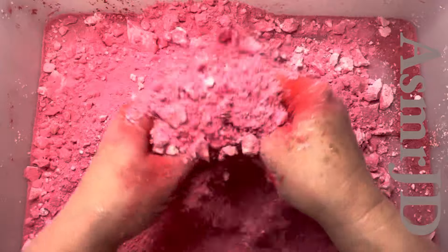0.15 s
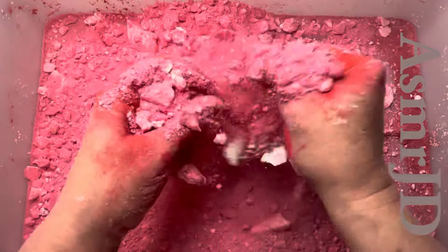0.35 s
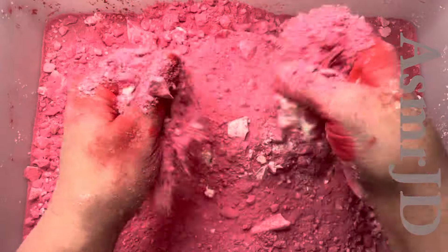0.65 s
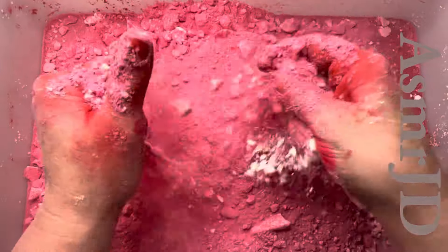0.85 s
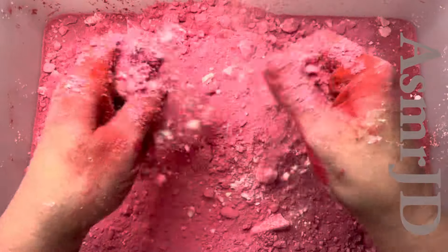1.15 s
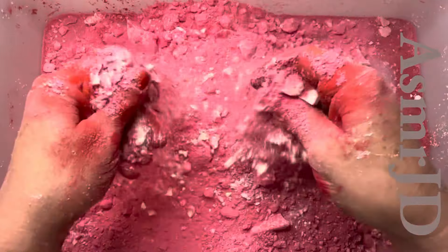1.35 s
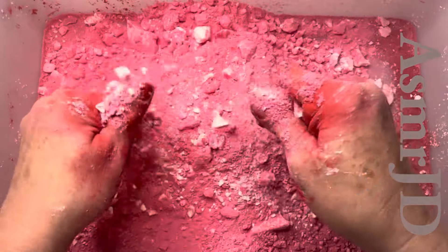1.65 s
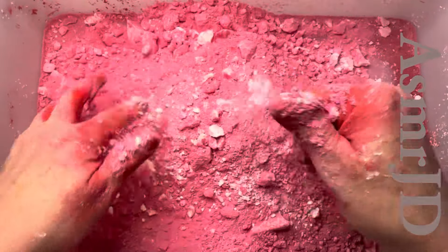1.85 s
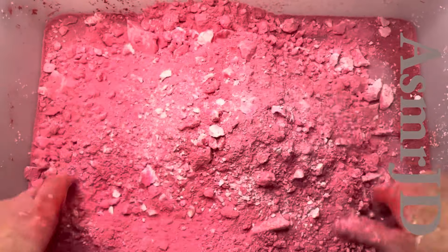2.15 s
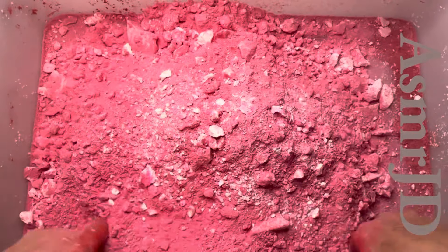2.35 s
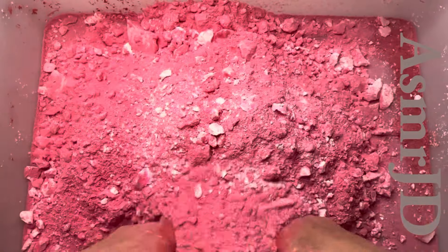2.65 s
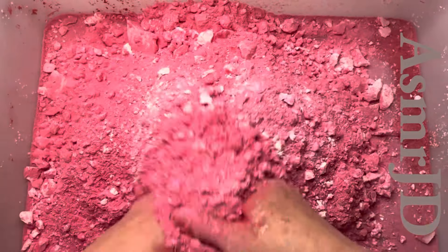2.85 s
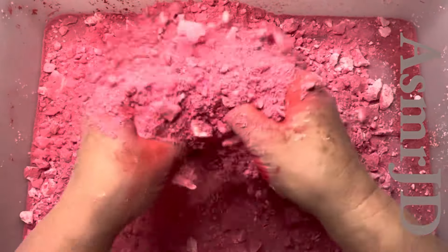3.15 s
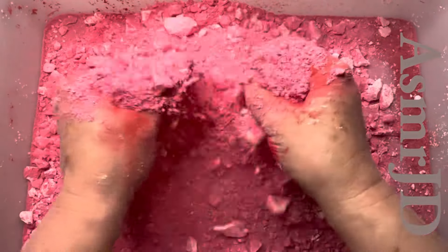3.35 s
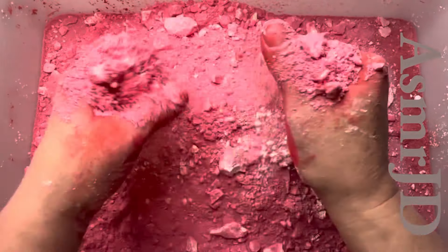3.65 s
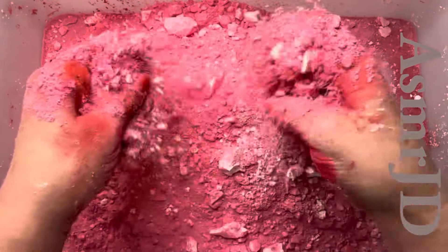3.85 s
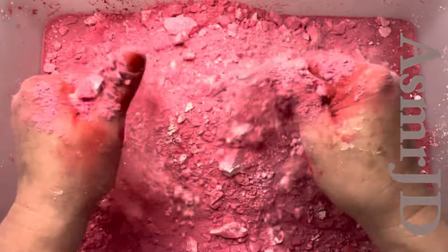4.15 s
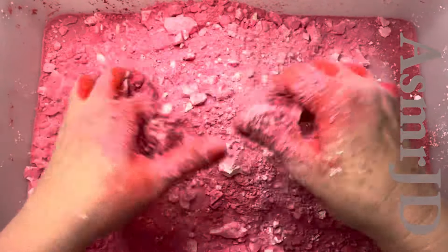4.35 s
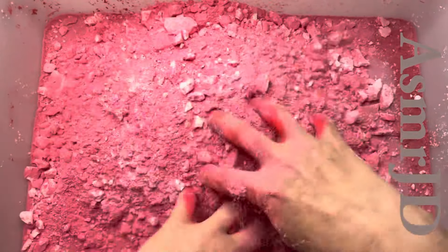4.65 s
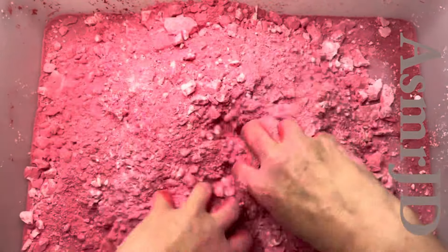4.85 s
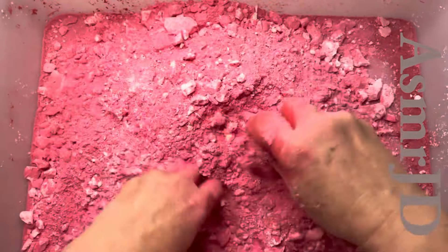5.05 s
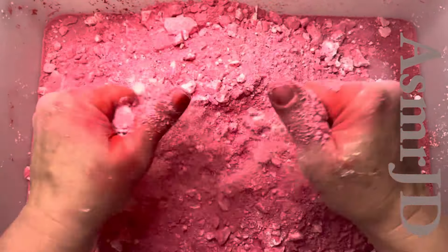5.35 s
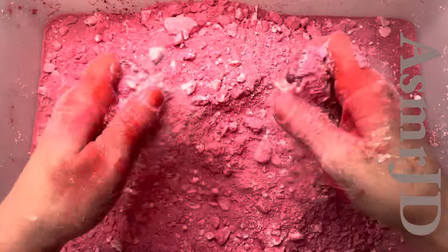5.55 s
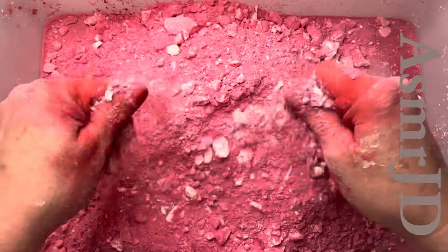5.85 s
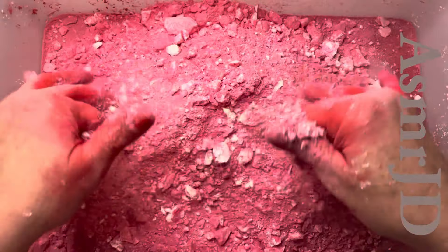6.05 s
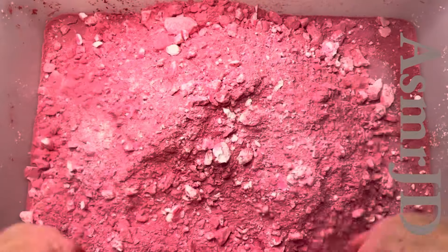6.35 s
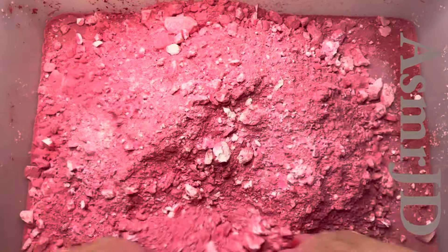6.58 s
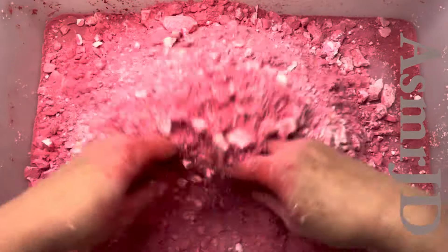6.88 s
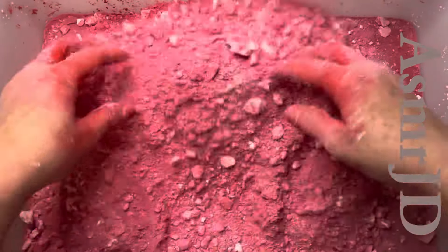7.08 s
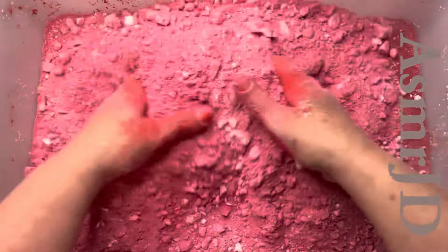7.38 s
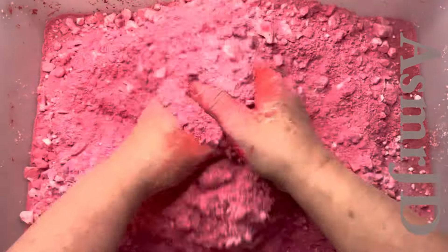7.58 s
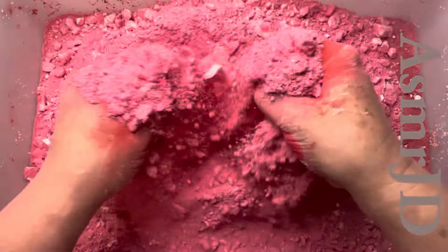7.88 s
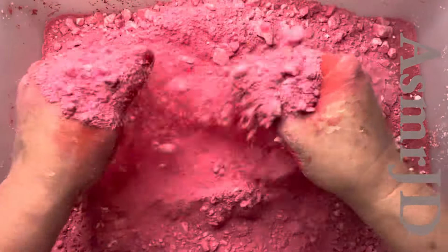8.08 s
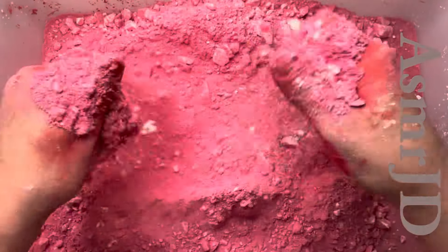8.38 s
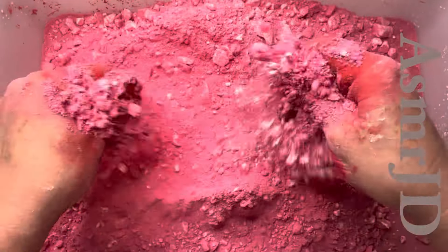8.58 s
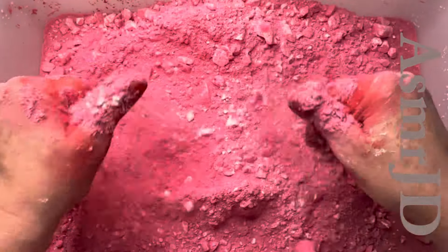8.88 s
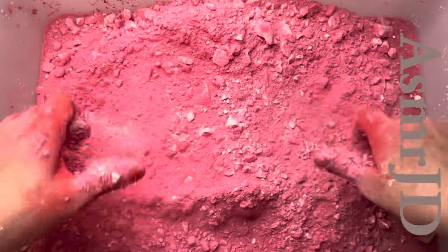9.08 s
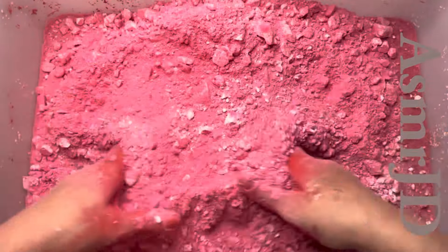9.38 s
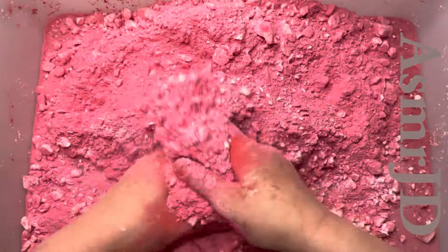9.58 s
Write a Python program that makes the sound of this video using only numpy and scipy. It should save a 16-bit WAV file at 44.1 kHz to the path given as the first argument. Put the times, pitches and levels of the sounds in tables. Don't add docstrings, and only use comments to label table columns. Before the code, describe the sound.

Close stereo microphones catch two hands working dry chalk in a plastic bin in a small, dry space. Scoops rustle dully, fists crunch lumps with sharp crackles, and crumbs patter as powder hisses down. The work eases briefly between handfuls, then grows denser after six seconds with two thumps. A hard knuckle knock booms on the bin floor near nine seconds. A low steady hum runs beneath throughout.

```python
import sys
import numpy as np
from scipy import signal
from scipy.fft import rfft, irfft, next_fast_len
from scipy.io import wavfile
from scipy.ndimage import uniform_filter1d, map_coordinates

SR = 44100
rng = np.random.default_rng(int(sys.argv[2]) if len(sys.argv) > 2 else 0)


def undo_db(level):
    steps = np.asarray(level, float) / 20
    return 10 ** steps


def store_wav(level_fs):
    pcm = np.round(np.clip(np.atleast_2d(level_fs), -1, 1) * 32767)
    wavfile.write(sys.argv[1], SR, pcm.T.astype(np.int16))


N = 428652

# peak time in seconds, level in dB, swell and fade in seconds per 10 dB.
SCOOPS = [(0.02, -44.5, 6, 0.2), (0.908, -48.5, 0.7, 0.07), (1.559, -50.5, 0.2, 0.2),
          (1.925, -52.2, -0.2, 0), (2.146, -52.5, 0.45, 4.5), (2.451, -44, -0.04, 0.4),
          (2.768, -36.5, 0.26, 0.13), (2.994, -39, 0.09, 0.079), (3.753, -55.5, -0.6, 0.2),
          (4.785, -41.5, 0.2, 0.4), (5.059, -46.5, 0.14, 0.08), (5.34, -51, -0.5, -0.3),
          (6.647, -36, 0.09, 0.18), (6.857, -41, 0.16, 0.13), (7.08, -33, -0.05, 0.28),
          (7.292, -38.5, 0.08, 0.218), (7.583, -40, 0.24, 0.17), (9.209, -28, 0.03, 0.055),
          (9.326, -36, 0.12, 0.07), (9.714, -38.5, 0.41, -4.5)]


def unit(x):
    return x / np.sqrt(np.mean(x ** 2) + 1e-20)


def along(points, hz):
    f, v = np.transpose(points)
    return np.interp(np.log(hz + 1), np.log(f + 1), v)


def wobble(rate):
    knots = rng.standard_normal(int(N * rate / SR) + 4)
    return map_coordinates(knots, [np.arange(N) * rate / SR])


def filtered(x, response):
    m = next_fast_len(N + SR // 2)
    return irfft(rfft(x, m) * response(np.fft.rfftfreq(m, 1 / SR)), m)[..., :N]


def coloured(x, spectrum):
    below = [(1, -120), (spectrum[0][0] / 2, -90)]
    above = [(spectrum[-1][0] * 2, -90)]
    return unit(filtered(x, lambda hz: undo_db(along(below + spectrum + above, hz))))


def machine():
    # frequency in Hz, level in dB rms.
    hum_lines = [(102, -51.5), (214, -71), (227, -62.5)]
    # frequency in Hz, room air in dB per Hz.
    air_spectrum = [(28, -11), (37, 16), (70, 2), (250, -11.5), (800, -57), (10000, -41), (16000, -22)]
    hum_hz, hum_db = 54.3, -33

    def drifting_tone(hz):
        return np.sin(2 * np.pi * np.cumsum(hz + 0.882 * wobble(9)) / SR)

    hum = undo_db(hum_db + 0.8 * wobble(4) + 0.9 * wobble(14)) * drifting_tone(hum_hz)
    lines = sum(undo_db(db + 2.8 * wobble(6)) * drifting_tone(hz) for hz, db in hum_lines)
    air = undo_db(-51.0) * coloured(rng.standard_normal((2, N)), air_spectrum)
    return np.sqrt(2) * (hum + lines) * [[1], [0]] + air


def walls(x):
    # frequency in Hz, decay by 60 dB in seconds.
    bin_decay = [(200, 0.069), (10000, 0.046)]
    hz, t, z = signal.stft(rng.standard_normal((2, SR // 6)), SR, nperseg=128)
    decay = undo_db(-60 * t / along(bin_decay, hz)[:, None])
    tail = signal.istft(z * decay, SR, nperseg=128)[1]
    return signal.fftconvolve(x, tail / np.linalg.norm(tail[0]), axes=1)[:, :N]


def curves(rows):
    quickest_s = 0.015
    s, db, swell, fade = np.transpose(rows)[..., None]
    t = np.arange(0, N, 32) / SR
    rising = (s - t) / np.maximum(swell, quickest_s)
    falling = (t - s) / np.maximum(fade, quickest_s)
    power = undo_db(db - 10 * np.where(t < s, rising, falling)) ** 2
    return np.interp(np.arange(N) / SR, t, np.sum(power, axis=0))


def bin_floor():
    # start in seconds, peak in dB, pitch in Hz, decay by 60 dB in seconds.
    blows = [
        (4.798, -35, 98, 0.37),
        (6.405, -18.5, 115, 0.2),
        (6.545, -21.5, 117, 0.12),
        (7.241, -24, 94.4, 0.22),
        (9.2013, -10, 232, 0.028),
        (9.202, -17, 400, 0.032),
        (9.204, -6, 123.5, 0.17),
    ]
    # frequency in Hz, drumming in dB per Hz.
    panel_spectrum = [(50, -30), (75, -2.5), (120, 0.5), (160, -13), (250, -59)]
    rest_db, load_db = -51, -6.5
    out, t = np.zeros(N + SR), np.arange(SR // 2) / SR
    for s, db, hz, t60 in blows:
        onset = (1 - np.exp(-t * hz / 0.63)) ** 2
        boom = undo_db(-60 * t / t60) * onset * np.sin(2 * np.pi * hz * t)
        overtone = undo_db(-8.0 - 60 * t / (0.18 * t60)) * np.sin(2 * np.pi * 2.06 * hz * t)
        table = undo_db(-9.5 - 60 * t / t60) * (1 - np.exp(-t / 0.016)) * np.sin(2 * np.pi * 66 * t)
        out[round(s * SR):][:len(t)] += undo_db(db + 2.5) * (boom + overtone + table)
    load = np.sqrt(undo_db(2 * rest_db) + undo_db(2 * load_db) * curves(SCOOPS))
    drum = load * undo_db(-3 + 2.8 * wobble(12)) * coloured(rng.standard_normal((2, N)), panel_spectrum)
    return drum + out[:N] * [[1], [0]]


def squeaks():
    # start in seconds, length in seconds, pitch in Hz, level in dB.
    slips = [
        (4.752, 0.038, 3725, -46),
        (6.369, 0.0079, 6300, -41),
        (.294, .01, 6400, -40),
        (7.154, 0.0063, 1850, -34),
        (7.162, .008, 1880, -37),
        (7.8, .007, 2300, -37),
    ]
    t = np.arange(N) / SR
    out = np.zeros(N)
    for s, length, hz, db in slips:
        swell = np.sqrt(np.sin(np.pi * np.clip((t - s) / length, 0, 1)).clip(0))
        out += undo_db(db + 2.4 * wobble(160)) * swell * np.sin(2 * np.pi * hz * t)
    return out


def cracks():
    # start in seconds, peak in dB, pitch in Hz.
    clean_snaps = [(.0346, -28.5, 1690), (0.265, -33, 1900), (0.3299, -26, 1080), (0.5404, -35, 2000),
                   (.706, -19.5, 3250), (.8462, -37, 1850), (1.2136, -27, 1490), (2.024, -38.5, 1660),
                   (3.0458, -21.5, 2600), (3.0573, -23, 1010), (3.3195, -27, 2940), (4.082, -20, 1870),
                   (4.0977, -30, 3100), (4.126, -29, 1350), (5.198, -22, 3060), (5.2557, -28, 3100),
                   (5.289, -36.5, 2810), (5.356, -40, 2300), (1.074, -43, 3500), (5.453, -30.5, 2340),
                   (6.0082, -39, 2870), (1.0252, -36, 2360), (6.3053, -15, 1850), (6.4037, -16, 1200),
                   (7.537, -24.5, 1290), (7.623, -20.5, 3600), (7.5274, -34, 2600), (8.1174, -31, 2040),
                   (8.3313, -30, 2800), (8.3432, -31, 1940), (8.456, -29.5, 3140), (9.4063, -34.5, 990),
                   (3.077, -33, 2400), (3.464, -34, 3100), (5.0787, -38, 2000), (6.099, -44, 3000),
                   (6.5103, -27.5, 2610), (7.037, -38.5, 2800), (7.598, -32, 2510), (8.2616, -42, 1500),
                   (8.56, -36, 2100)]
    flake_spits = [(.123, -31, 6740), (.291, -23.5, 2820), (.73, -29, 5400), (.977, -34, 3960),
                   (1.095, -36, 3320), (1.5278, -29.5, 6090), (1.793, -40, 2240), (1.841, -32, 5730),
                   (3.1727, -30, 2710), (3.4, -36, 2900), (3.4867, -26.5, 970), (3.8507, -33, 1860),
                   (4.1419, -29.5, 2520), (4.932, -26.5, 1020), (5.0959, -16.5, 4020), (5.099, -16.5, 3300),
                   (5.133, -19, 5800), (5.153, -24, 5560), (5.1617, -25, 2930), (5.1855, -20, 5770),
                   (5.235, -19.5, 3720), (5.6312, -32, 2090), (5.816, -29.5, 4020), (7.6123, -22, 3260),
                   (8.136, -24.5, 1870), (8.284, -20, 3160), (8.306, -31.5, 1720), (8.6948, -26.5, 2900),
                   (8.8288, -29.5, 3200), (9.0303, -37, 6200)]
    deep_knocks = [(0.135, -27.5, 1130), (0.1927, -32.5, 830), (1.1718, -20.5, 1700), (1.4645, -30, 1860),
                   (3.111, -25, 1570), (3.1805, -19.5, 860), (3.188, -21, 1110), (3.2856, -27.5, 1810),
                   (3.3248, -26.5, 860), (3.824, -36.5, 1770), (6.124, -22, 890), (7.0612, -22, 870),
                   (7.0697, -22, 1660), (7.0809, -22.5, 1740), (7.2722, -28, 965), (7.736, -14.5, 1520),
                   (7.8123, -27.5, 1220), (7.8629, -16.5, 1900), (7.8764, -45, 1680), (8.0412, -19.5, 5900),
                   (8.052, -24.5, 1320), (8.1037, -26.5, 1510), (8.139, -25.5, 820), (8.9887, -33, 1400),
                   (9.2017, -26, 1000)]
    big_shatters = [(.2978, -25, 6460), (0.6697, -31.5, 3400), (1.311, -25.5, 3070), (1.37, -28, 3770),
                    (1.983, -36, 1330), (3.178, -16.5, 2620), (3.373, -17, 3030), (3.5633, -26.5, 2540),
                    (4.4084, -36.5, 1240), (4.6678, -41, 1370), (5.6955, -30.5, 2410), (6.1657, -39, 6000),
                    (6.1766, -33.5, 1720), (6.3096, -21.5, 1020), (6.3164, -24, 6450), (7.6933, -30.5, 890),
                    (7.979, -23, 5500), (9.132, -35, 8050), (9.196, -15, 1620)]
    crumb_ticks = [(0.2219, -40, 2120), (0.3536, -31, 2020), (0.389, -32, 2430), (0.4284, -37, 2150),
                   (0.4633, -36.5, 6090), (0.6, -36, 1320), (0.632, -35, 1390), (0.754, -36, 2970),
                   (0.7961, -39, 2790), (0.8854, -31.5, 2370), (0.8976, -34, 1390), (1.244, -37, 1360),
                   (1.3844, -35, 1430), (1.441, -43, 2060), (1.6736, -33, 7000), (1.8647, -39, 1520),
                   (2.9421, -29.5, 1910), (3.0942, -28, 2860), (3.1508, -38, 2730), (3.2605, -30, 1510),
                   (3.4104, -33, 1430), (3.8751, -48, 1410), (4.0547, -38, 1870), (4.1847, -39, 3030),
                   (4.8994, -39, 1300), (5.032, -35, 1490), (6.5473, -28, 1440), (6.9733, -38, 1310),
                   (7.124, -38, 1750), (7.2285, -37, 1700), (7.2944, -42, 1670), (7.3163, -38, 1450),
                   (7.496, -45, 1330), (7.9119, -26.5, 2110), (8.184, -40, 1510), (8.4067, -37.5, 1940),
                   (8.4243, -36, 1600), (8.5321, -30, 1320), (8.5994, -37, 1310), (8.6606, -30, 2720),
                   (8.76, -31, 5840), (8.8154, -32, 1940), (8.8444, -38, 2530), (8.9615, -39, 1340)]
    soft_clods = [(0.057, -35, 1360), (0.299, -25, 840), (0.334, -25, 848), (0.358, -32, 689),
                  (0.818, -35, 947), (1.556, -43, 624), (2.097, -36, 624), (2.275, -27.5, 837),
                  (2.42, -35, 646), (2.502, -29, 641), (2.634, -32, 694), (2.797, -29, 600),
                  (2.95, -28, 853), (4.864, -32.5, 816), (5.662, -38, 861), (6.093, -41, 729),
                  (6.66, -21, 600), (6.749, -29.5, 600), (6.873, -35, 950), (7.094, -21.5, 716),
                  (7.25, -25, 673), (7.314, -41, 902), (7.554, -27, 705), (7.648, -27, 719),
                  (7.924, -33, 622), (8.196, -42, 937), (8.643, -45, 614), (9.115, -40.5, 678),
                  (9.167, -37, 689), (9.518, -50, 738), (9.622, -31, 606), (9.661, -45, 711),
                  (9.697, -40, 627)]
    # dull part in dB, bright part in dB.
    balances = [
        (-19, -29),
        (-33, -5),
        (-1.5, -16),
        (-6.5, -2),
        (-19, -9),
        (-2.5, -19),
    ]
    knock_lags = 0.54
    kinds = [clean_snaps, flake_spits, deep_knocks, big_shatters, crumb_ticks, soft_clods]
    breaks = sorted(tuple(row) + tuple(balance) for rows, balance in zip(kinds, balances) for row in rows)
    out, t = np.zeros((2, N + SR)), np.arange(SR // 60) / SR
    chance = rng.standard_normal((len(breaks), 6, len(t)))
    bright = signal.butter(1, [4200, 9500], "bandpass", fs=SR)

    def falling_tone(hz, end, fall_s):
        cycles = end * t + (1.3 - end) * fall_s * (1 - np.exp(-t / fall_s))
        return np.sin(2 * np.pi * hz * cycles)

    for (s, db, hz, dull_db, bright_db), z in zip(breaks, chance):
        snap = undo_db(-60 * t * np.sqrt(hz / 2000) / 0.0027) * falling_tone(hz, end=0.37, fall_s=0.00098)
        snap += undo_db(-17.5 - 60 * t * hz / 14) * np.sin(2 * np.pi * hz * t)
        spit = undo_db(bright_db - 1.3 - 60 * t / 0.0056) * signal.lfilter(*bright, np.sign(z[:2]))
        band = signal.butter(1, np.clip([0.5 * hz, 0.79 * hz], 50, SR / 2.2), "bandpass", fs=SR)
        rubble = undo_db(-3.5 - 60 * t / 0.011) * signal.lfilter(*band, z[4:])
        knock = undo_db(dull_db + 4.0 - knock_lags * (db + 26.0) - 60 * t / 0.012)
        knock *= 1 - np.exp(-t / 0.0014)
        knock *= falling_tone(620 * undo_db(2.27 * z[3, 0]), end=0.77, fall_s=0.0029)
        place = [[1], [np.tanh(z[2, 0])]]
        out[:, round(s * SR):][:, :len(t)] += undo_db(db + 4.5) * (spit + rubble + (snap + knock) * place)
    return out[:, :N]


def hush():
    # start in seconds, end in seconds, depth in dB.
    rests = [
        (1.07, 1.155, 4),
        (1.877, 1.994, 6.5),
        (2.202, 2.258, 3),
        (4.505, 4.623, 6.5),
        (6.236, 6.293, 15),
        (9.065, 9.112, 17),
    ]
    stop_s, start_s = 0.084, 0.016
    t = np.arange(N) / SR
    lost = np.zeros(N)
    for a, b, db in rests:
        lost += db * np.clip(np.minimum((t - a) / stop_s + 0.5, (b - t) / start_s + 0.5), 0, 1)
    return lost


def work():
    # time in seconds, level in dB, weight of the handful in dB, fade in seconds per 10 dB.
    fists = [(0.308, -42, 1.5, 0.02), (0.572, -55, -16, 0.97), (0.714, -48, -4.5, 0.21),
             (1.192, -48.5, -9, 0.03), (1.366, -46.5, -2, -0.07), (1.873, -57, -11, -0.04),
             (2.109, -47.5, 0, 0), (2.298, -52.5, 1.5, 0.56), (3.022, -41, -14.5, 0.36),
             (3.19, -49, 12, -0.01), (3.282, -43.5, 7.5, 0.06), (3.467, -57.5, 3.5, 0.86),
             (3.839, -50.5, 2.5, 0.1), (4.104, -51.5, 7.5, 0.06), (4.412, -50, 3.5, -0.5),
             (4.685, -44, 5, -0.07), (4.902, -45.5, -12.9, 0.12), (5.133, -46.5, -15, -0.15),
             (5.475, -59, -10, 0.04), (5.684, -54, 7.5, 0.241), (6.137, -51.5, 3.5, 0.4),
             (6.325, -38.5, 3, 0), (6.419, -46.5, 6.5, 0.36), (7.079, -36.5, -5, -0.04),
             (7.662, -38.5, -0.5, 0.13), (7.878, -38, -2.5, 0.14), (8.08, -50.5, 6.5, 0.38),
             (8.482, -55, 2, 0.162), (8.704, -47, -0.5, -0.38), (8.836, -52.5, 7, 0.05)]
    # peak time in seconds, level in dB, swell and fade in seconds per 10 dB.
    siftings = [(0.076, -55.5, 5, 0.4), (0.907, -52.5, 0.66, 0.18), (1.36, -53.5, 0.4, 0.14),
                (1.552, -56, 0, 0.13), (1.706, -51, 0.1, 0.04), (2.372, -48, 0.12, 0.53),
                (2.743, -52.5, 0.47, 0.16), (3.299, -48.5, 0.08, 0.05), (3.486, -48, 0.18, -0.06),
                (3.756, -55.5, 0, 0.2), (4.037, -51, 0.22, 0.4), (4.367, -68, 1, 0.1),
                (4.791, -55.5, 0.15, 0.47), (5.154, -42, 0.05, 0.09), (5.635, -52, -0.02, 0.4),
                (6.018, -55, 0.37, 0.06), (6.427, -46, 0.06, 0.12), (6.634, -47.5, 0.2, 0.18),
                (7.305, -53, 0.12, 0.23), (8.132, -47, 0.16, 0.08), (8.293, -58, 0.1, 0.5),
                (8.623, -53.5, -0.1, 0.144), (8.789, -48.5, 0.184, 0.111), (8.994, -63, -1, 1.2),
                (9.21, -47, 0.02, 0.16), (9.451, -51, 0.28, 0.26)]
    fist_swell_s = 0.038
    scoop_crunch_db, scoop_hiss_db, squeeze_hiss_db = -11.5, -23, -7.5
    sift_shear_db, sift_crunch_db = -6.5, -10
    hiss_lags = 0.57
    rest_db = -91
    scoop, sift = curves(SCOOPS), curves(siftings)
    s, db, weight_db, fade = np.transpose(fists)

    def squeeze(level_db):
        return curves(np.transpose([s, level_db, np.full_like(s, fist_swell_s), fade]))

    shear = scoop + squeeze(db + weight_db) + undo_db(2 * sift_shear_db) * sift
    crunch = undo_db(2 * scoop_crunch_db) * scoop + squeeze(db) + undo_db(2 * sift_crunch_db) * sift
    hiss = undo_db(2 * scoop_hiss_db) * scoop + sift
    hiss += squeeze(db + squeeze_hiss_db - hiss_lags * (db + 48.5))
    return 10 * np.log10(np.array([shear, crunch, hiss]) + undo_db(2 * rest_db)) - hush()


def grit(per_second, spread_db, decay_s):
    draw = rng.random((2, N))
    breaks = (draw[0] < per_second / SR) * undo_db(spread_db * draw[1])
    return unit(signal.lfilter([1], [1, -np.exp(-1 / (decay_s * SR))], breaks))


def crumbs(per_second, centre_hz, spread_db):
    draw, t = rng.random((round(per_second * N / SR), 4)), np.arange(240) / SR
    hz = centre_hz * undo_db(18.66 * (draw[:, 1:2] - 0.5))
    decay = undo_db(spread_db * draw[:, 2:3] - 60 * t * hz / 5.9)
    ring = decay * np.sin(2 * np.pi * hz * t * (1 - 25 * t))
    at = (draw[:, :1] * N).astype(int) + np.arange(len(t))
    sides = [ring, ring * np.sign(draw[:, 3:] - 0.5)]
    return unit(np.array([np.bincount(at.ravel(), r.ravel(), N + len(t))[:N] for r in sides]))


def patchy(x, depth_db):
    z = signal.stft(x, nperseg=512)[2]
    field = uniform_filter1d(rng.standard_normal(z.shape[1:]), size=7, axis=0)
    field = uniform_filter1d(field, size=12, axis=1)
    return unit(signal.istft(z * undo_db(depth_db * unit(field)), nperseg=512)[1][:, :N])


def powder():
    # frequency in Hz, level in dB per Hz.
    shear_spectrum = [(90, -26), (170, 1), (400, -3), (700, -4.5), (1100, -15), (2000, -25.5)]
    crunch_spectrum = [(400, -12.5), (900, 3.5), (1500, -3), (2600, -2.5), (4000, -10), (7000, -23)]
    hiss_spectrum = [(1500, -6.5), (3000, -2), (7000, -0.5), (10000, -4.5), (13000, -4.5), (15600, -8),
                     (17000, -22)]
    shear_db, crunch_db, hiss_db = work()
    gritty = np.clip(1.29 - (shear_db - hiss_db) / 14, 0.25, 1)
    shared = gritty * grit(110, spread_db=21.0, decay_s=0.003)
    knead = wobble(22)

    def noise():
        return rng.standard_normal((2, N))

    shear_grit = 0.43 * shared + 0.54 * grit(50.66, spread_db=4.5, decay_s=0.0081)
    shear = coloured(noise() * (1 + shear_grit), shear_spectrum)
    crunch = coloured(noise() * (1 + 1.27 * shared), crunch_spectrum)
    hiss = coloured(patchy(noise(), depth_db=2.0) * (1 + 0.5 * shared), hiss_spectrum)
    shear += 0.5 * crumbs(260, 785, spread_db=6.5)
    crunch += 1.14 * gritty * crumbs(260, 1500, spread_db=17.5)
    hiss += 0.5 * gritty * crumbs(350, 4670, spread_db=1)
    shear *= undo_db(shear_db - 0.5 + 1.4 * knead + 1.15 * wobble(30))
    crunch *= undo_db(crunch_db + 1.13 * knead + 1.6 * wobble(30))
    hiss *= undo_db(hiss_db + 3.0 + gritty * (2.06 * knead + 0.89 * wobble(30)))
    return shear + crunch + hiss


def scene():
    # frequency in Hz, left-right likeness from -1 to 1.
    likeness = [(60, 0.84), (250, 0.98), (700, 0.22), (1400, 0.91), (3000, 0.62), (4700, 0.38), (5600, 1),
                (8000, 0.38), (12000, 0.57)]
    snaps = cracks()
    parts = powder() + snaps + undo_db(-9) * walls(snaps) + bin_floor() + machine() + squeaks() * [[1], [0]]

    def shares(hz):
        angle = np.arccos(np.clip(along(likeness, hz), -1, 1)) / 2
        return np.array([np.cos(angle), np.sin(angle)])

    mid, side = filtered(parts, shares)
    return np.array([mid + side, mid - side])


def thinned(pair):
    hz, _, z = signal.stft([pair[0] + pair[1], pair[0] - pair[1]], SR, nperseg=512)
    treble = np.log(np.sum(np.abs(z[1, hz > 8000]) ** 2, axis=0) + 1e-20)
    calm = treble < uniform_filter1d(treble, size=15) + 1.4
    block = np.arange(z.shape[2]) // 4
    luck = rng.random((3, z.shape[2]))[:, block]
    edge = 10900 + 1600 * (luck[0] - 0.5)
    col = hz[:, None]
    patch = (col > 15400 - 1100 * luck[0]) & (uniform_filter1d(luck[1], size=13) > 0.53)
    z[0] *= ~(calm & (col > edge) & ~patch)
    z[1] *= ~(calm & (col > 5150 + 500 * luck[1]) & (col < 7550) & (luck[2] > 0.07))
    z *= ~(calm & (col > 15800)) & (col < 16600)
    total, difference = signal.istft(z, SR, nperseg=512)[1][:, :N] / 2
    return np.array([total + difference, total - difference])


def roll_off(x):
    return signal.sosfilt(signal.butter(12, 17070, fs=SR, output="sos"), x)


def record(dry):
    # frequency in Hz, left minus right in dB.
    port_tilt = [(100, -1.63), (1500, -2), (5000, 0.4), (12000, -2)]
    # frequency in Hz, phase by which left leads in radians.
    port_lead = [(4000, 0), (4800, -2), (5400, -5.5), (7400, -6), (7800, -7.5), (9600, -7.5), (11500, -9.5),
                 (16000, -9)]

    def port_response(hz):
        gain = undo_db(along(port_tilt, hz) / [[2], [-2]])
        return gain * np.exp(0.5j * along(port_lead, hz) * [[1], [-1]])

    mix = thinned(filtered(dry, port_response))
    return roll_off(mix)


dry = scene()
out = record(dry)
store_wav(out)
```